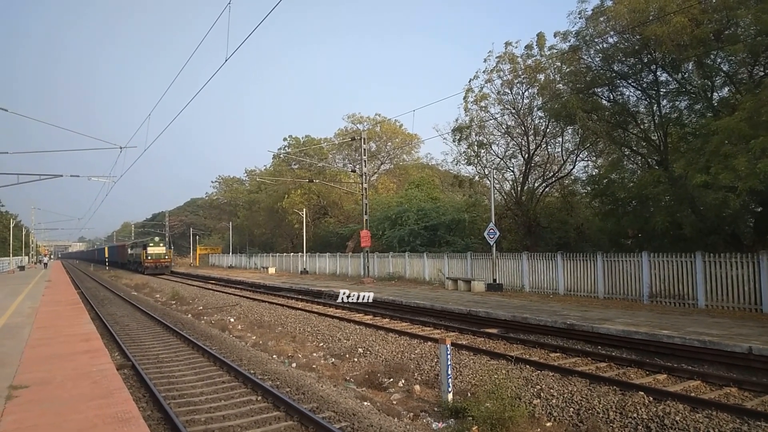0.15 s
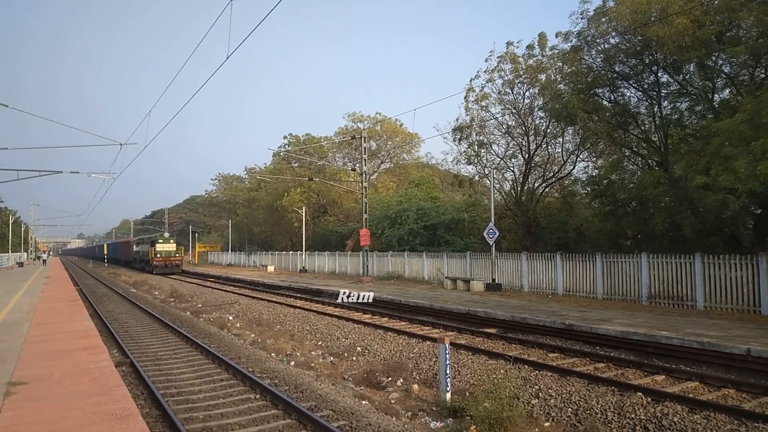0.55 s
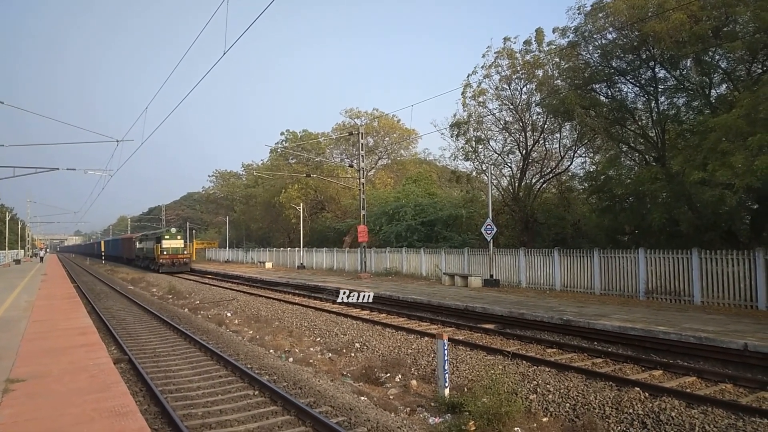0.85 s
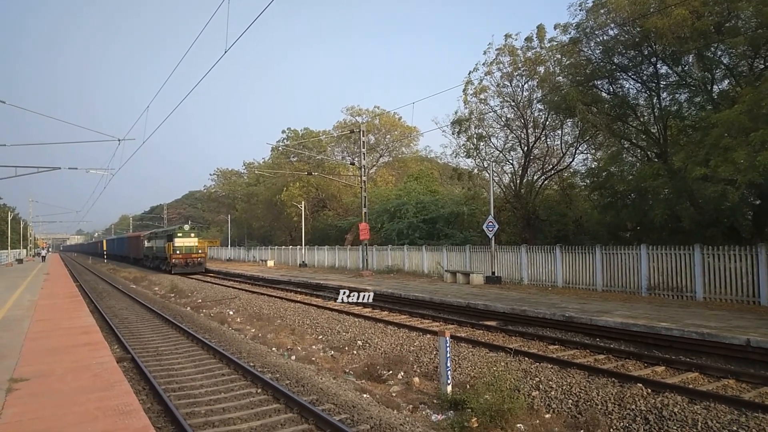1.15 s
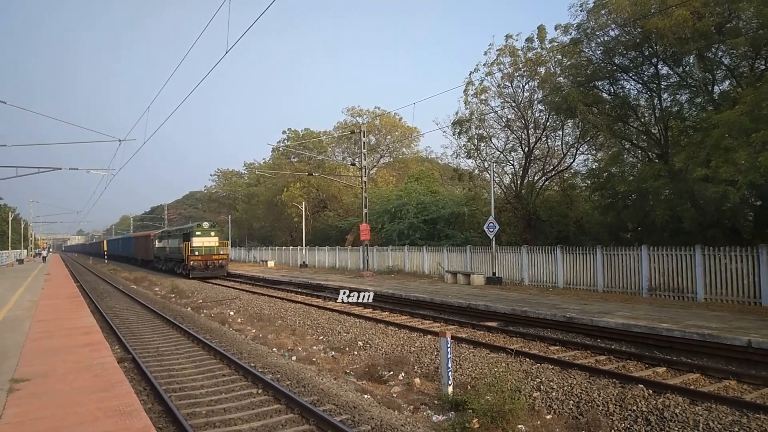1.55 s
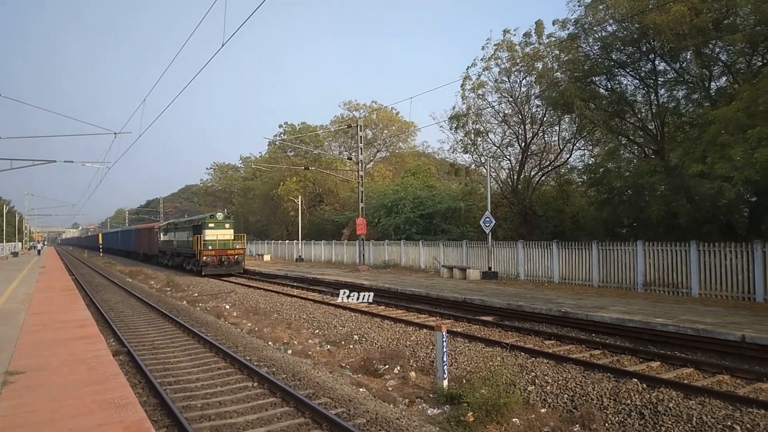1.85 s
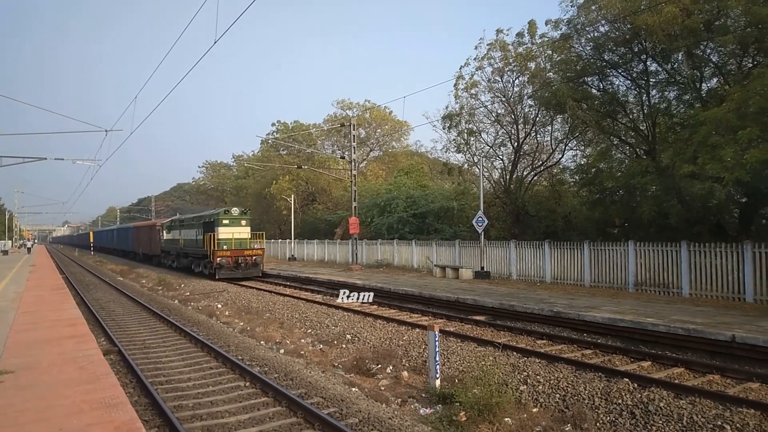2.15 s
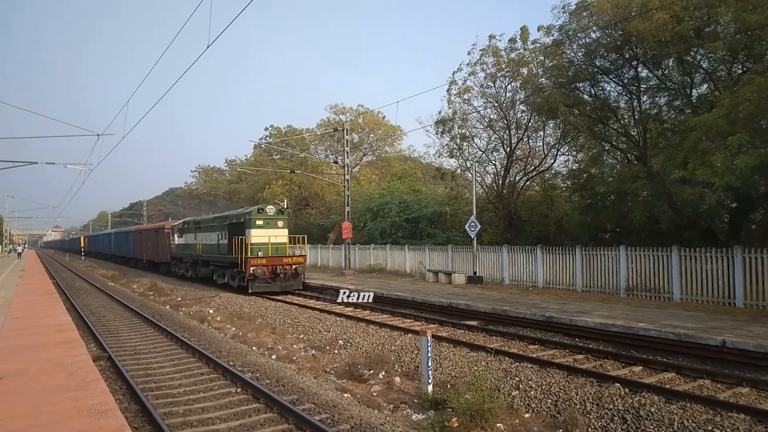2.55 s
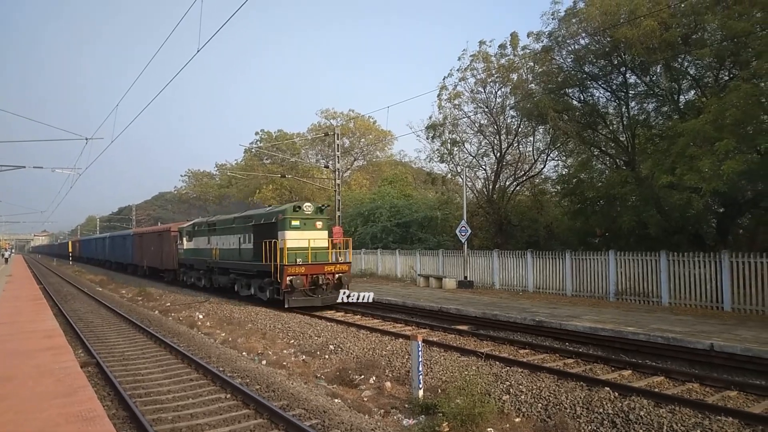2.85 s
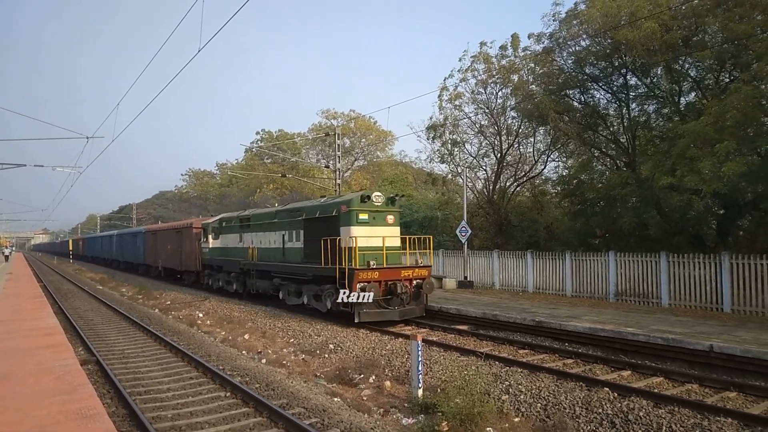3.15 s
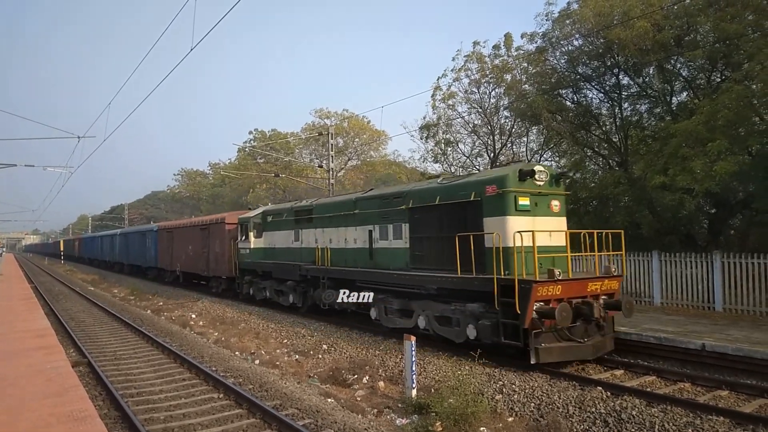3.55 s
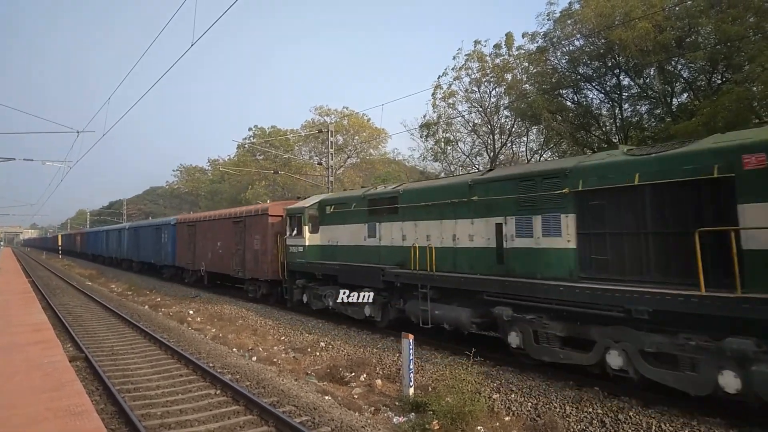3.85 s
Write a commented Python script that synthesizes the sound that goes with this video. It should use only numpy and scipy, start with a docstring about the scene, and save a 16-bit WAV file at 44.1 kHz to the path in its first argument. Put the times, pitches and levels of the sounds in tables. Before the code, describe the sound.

A diesel freight train comes from far to very near outdoors at a station platform: low throbbing engine and faint rail hiss first, then a swelling rolling roar, metallic clacks, overloading a small stereo recorder.

```python
"""Freight train approaching a platform

A diesel locomotive hauls freight closer. Its twelve cylinders thud unevenly: impulses ring a resonant exhaust pipe,
over a firing tone with its multiples. The rolling roar is coloured noise that swells and blends from far to near.
The rails hiss and sing: each jolt of a wheel runs ahead along the steel, treble first, as dispersed noise,
while narrow noise bands whistle at the rail's modes. Wheels and couplings clack as short noise bursts.
A small two-port recorder clips as the train arrives."""
import sys
import numpy as np
from scipy import signal
from scipy.fft import irfft
from scipy.io import wavfile
from scipy.ndimage import uniform_filter1d

SR = 44100
rng = np.random.default_rng(int(sys.argv[2]) if len(sys.argv) > 2 else 0)


def rack_gain(trim_db):
    """Turn a fader trim in dB into the linear factor to multiply a signal by."""
    fader = np.asarray(trim_db, float)
    return 10 ** (fader / 20)


def put_to_file(sound):
    """Save the sound as 16-bit audio at rate SR, in the file named by the first command-line argument."""
    columns = np.atleast_2d(sound).T  # one column per channel
    safe = np.clip(columns, -1, 1)
    whole_steps = np.round(safe * 32767)
    wavfile.write(sys.argv[1], SR, whole_steps.astype(np.int16))


N = 176400
T = np.arange(N) / SR


def evened(x):
    """Power normalisation: the signal is scaled to rms 1."""
    return x / np.sqrt(np.mean(x ** 2) + 1e-20)


def read(points, hz):
    """Spectral interpolation: a table value on a log-frequency axis."""
    f, value = np.transpose(points)
    return np.interp(np.log(hz + 1), np.log(f + 1), value)


def curve(rows, t):
    """Temporal interpolation: every column of a time table, at times t."""
    rows = np.array(rows)
    return [np.interp(t, rows[:, 0], column) for column in rows[:, 1:].T]


def drift(t, top_hz):
    """Random modulation: sines of chance phase, weaker toward top_hz, together of rms 1."""
    waves = [np.sin(2 * np.pi * (f * t + rng.random())) / np.sqrt(f) for f in np.geomspace(.5, top_hz, 20)]
    return evened(sum(waves))


def patchy(shape, frames, bins):
    """Correlated fluctuation: chance smoothed over frames and bins, of rms 1."""
    smooth_in_time = uniform_filter1d(rng.standard_normal(shape), frames, 0)
    return evened(uniform_filter1d(smooth_in_time, bins, 1))


def unit(db, hz, lo_hz, hi_hz):
    """Spectral normalisation: gains scaled to power 1 inside a band."""
    gain = rack_gain(db)
    in_band = (hz > lo_hz) & (hz < hi_hz)
    return gain / np.sqrt((gain[..., in_band] ** 2).sum(-1, keepdims=True))


def held(t, length, rise, fall, change_db):
    """Envelope of a driven, damped source: linear rise, hold changing by change_db, exponential fall."""
    hold = rack_gain(change_db * np.clip(t / length, 0, 1))
    return np.clip(t / rise, 0, 1) * hold * np.exp(-np.maximum(t - length, 0) / fall)


# Level difference of the ports: frequency_hz, left_minus_right_db
PORT_LEAN = [(60, 0.5), (200, -2), (360, 2), (660, -4.5), (1200, .5), (2200, 3.5), (4000, 3), (5800, 6.5),
             (7400, 6), (8800, -2.5), (10500, -19.5), (11700, -10), (12800, -6.5), (13500, 2)]
# Coherence of the ports: frequency_hz, likeness (0-1)
PORT_LIKENESS = [(60, 0.84), (130, 0.99), (280, 0.9), (610, 0.8), (1000, 0.9), (1500, 0.18), (3000, 0.12),
                 (13000, 0.25)]
LAG_S, LAG_FROM_HZ = 0.000606, 684


def ports(z, other, hz):
    """Spatial coherence: the two microphone ports hear alike in the bass, apart and staggered in the treble."""
    same = np.clip(read(PORT_LIKENESS, hz), 0, 1)
    turn = np.exp(-2j * np.pi * LAG_S * np.maximum(hz - LAG_FROM_HZ, 0))
    lean = rack_gain(read(PORT_LEAN, hz) / 2)
    left = z * turn * lean
    right = (same * z + np.sqrt(1 - same ** 2) * other) / lean
    return np.array([left, right])


def noise(field, size):
    """Time-varying filtering: stereo noise of gain field(t, hz); a flat field of unit sum has rms near 1."""
    t = np.arange(N * 4 // size + 5)[:, None] * size / 4 / SR
    hz = np.fft.rfftfreq(size, 1 / SR)
    a, b, c, d = np.moveaxis(rng.standard_normal((len(t), len(hz), 4)), 2, 0)
    z = ports(a + 1j * b, c + 1j * d, hz) * field(t, hz)
    return signal.istft(z.swapaxes(1, 2), nperseg=size, noverlap=size * 3 // 4)[1][:, :N]


# Exhaust puffs in one engine cycle: place (periods of the firing tone, six to a cycle)
PUFF_PLACES = [.44, .92, 1.44, 1.92, 2.44, 2.92, 3.44, 3.92, 4.4, 4.88, 5.36, 5.6]
# Strength of each of those puffs: relative_level_db
PUFF_DB = [-14, -22, -7, -22, -11, -24, -2, -14, 0, -3, -2, -5]
# Resonances of the exhaust pipe: frequency_hz, width_hz, relative_peak_db
PIPE = [(51, 20, -6), (125, 53, -22.5), (158, 32, -10.5), (204, 26, -2.5), (257, 31, -13.5)]
# Weak multiples of the engine cycle: multiple (of the cycle rate)
ORDERS_HEARD = [3, 4, 7, 8, 9, 10, 16, 17, 19, 21]
# Their levels: relative_level_db (to the firing tone)
ORDER_DB = [-26, -30, -26, -20, -17, -19, -24, -24, -22, -22]
# Engine parts, before the port gain: time_s, firing_tone_db, exhaust_thuds_db,
# drone_db (on the 25th multiple of the cycle)
ENGINE = [(0, -23.5, -41, -55), (.15, -24, -31, -49), (.2, -27, -23, -39), (.25, -24.5, -34.5, -41.5),
          (.6, -23, -36, -39), (1.1, -17, -31.5, -36), (1.17, -25, -32, -20), (1.25, -19, -31.5, -37),
          (1.5, -18, -26, -33.5), (1.8, -16.5, -30, -33.5), (2.4, -13.5, -29, -26.5),
          (2.9, -12.5, -36, -22.5), (3.3, -14.5, -20.5, -34), (3.7, -14, -15.5, -16), (4, -11, -10.5, -17)]
# Firing rate at the start, its slope and its quadratic term; opening phase in turns
FIRING_HZ, GAIN_HZ_PER_S, SURGE_HZ_PER_S2, FIRST_TURN = 36.297, .4592, .1122, .224
OCTAVE_DB, OCTAVE_TURN, DRONE_TURN = -14, -.36, .08
UNEVEN_DB, UNEVEN_S, CYCLE_UNEVEN_DB = 2., .0004, 1.  # rms, per puff, per puff, per cycle
PUFF_SIGMA_S = .001
# The drone chugs once per cycle: share of the cycle, sharpness at start and at end
CHUG_PLACE, CHUG_FAR, CHUG_NEAR = .83, 2.2, .1
# Each chug sweeps up to the 33rd multiple a little later (share of the cycle)
UPPER_LATE, UPPER_SHARP, UPPER_FAR_DB, UPPER_NEAR_DB = 0.038, 2.3, -1, -13.5
ORDER_WAVER_DB, TONE_WAVER_DB, DRONE_WAVER_DB = 1.13, 1., .8  # rms


def engine():
    """Periodic excitation: a harmonic firing tone, a pulsed drone, and uneven puffs ringing pipe resonances."""
    turns = FIRST_TURN + FIRING_HZ * T + GAIN_HZ_PER_S * T ** 2 / 2 + SURGE_HZ_PER_S2 * T ** 3 / 3
    cycle = turns / 6
    tone_db, thud_db, drone_db = curve(ENGINE, T)

    tone = np.cos(2 * np.pi * turns) + rack_gain(OCTAVE_DB) * np.cos(2 * np.pi * (2 * turns + OCTAVE_TURN))
    for order, db in zip(ORDERS_HEARD, ORDER_DB):
        wavering = rack_gain(db + ORDER_WAVER_DB * drift(T, 4.1))
        tone += wavering * np.cos(2 * np.pi * (order * cycle + rng.random()))

    sharpness = np.interp(T, [0, T[-1]], [CHUG_FAR, CHUG_NEAR])
    chug = evened(np.exp(sharpness * np.cos(2 * np.pi * (cycle - CHUG_PLACE))))
    upper = evened(np.exp(UPPER_SHARP * np.cos(2 * np.pi * (cycle - CHUG_PLACE - UPPER_LATE))))
    upper = upper * rack_gain(np.interp(T, [2.2, 3.4], [UPPER_FAR_DB, UPPER_NEAR_DB]))
    drone = np.cos(2 * np.pi * (25 * cycle + DRONE_TURN)) * chug
    drone = drone + upper * np.cos(2 * np.pi * (33 * cycle + rng.random()))

    # 28 cycles of 12 puffs, each a little off in time and strength
    chance = rng.standard_normal((28, 12, 2))
    places = PUFF_PLACES + 6 * np.arange(28)[:, None]
    when = np.interp(places, turns, T, -1, -1) + UNEVEN_S * chance[..., 0]
    cycle_db = CYCLE_UNEVEN_DB * rng.standard_normal((28, 1))
    strength = rack_gain(PUFF_DB + UNEVEN_DB * chance[..., 1] + cycle_db)
    keep = (when > 0) & (when < T[-1])
    puffs = np.zeros(N)
    np.add.at(puffs, (when[keep] * SR).astype(int), -strength[keep])

    t = T[:8000]
    ring = sum(rack_gain(g) * w * np.exp(-np.pi * w * t) * np.cos(2 * np.pi * f * t) for f, w, g in PIPE)
    soft = np.exp(-.5 * (np.arange(-300, 301) / SR / PUFF_SIGMA_S) ** 2)
    rung = signal.oaconvolve(puffs, ring)[:N]
    thuds = evened(signal.oaconvolve(rung, soft, "same"))

    tone = rack_gain(tone_db + TONE_WAVER_DB * drift(T, 27)) * tone
    drone = rack_gain(drone_db + DRONE_WAVER_DB * drift(T, 3.8)) * drone
    mono = np.sqrt(2) * (tone + drone) + rack_gain(thud_db) * thuds
    return mono * rack_gain([[-.65], [.65]])


# Rolling roar: time_s, relative_level_db (300-4000 Hz), nearness (0-1)
ROAR = [(0, -36, 0.35), (.9, -34, 0.4), (1.7, -29.5, 0.55), (2.2, -26, 0.54), (2.7, -21.5, 0.57),
        (3.1, -18, 0.64), (3.3, -16.5, 0.62), (3.5, -14.5, 0.77), (3.7, -12.5, 0.77), (4, -11, 0.76)]
# Colour of the distant roar: frequency_hz, relative_density_db (per Hz)
FAR_COLOUR = [(20, -16), (30, 19), (65, 2), (92, -55), (150, 6.5), (220, -3), (270, -15.5), (390, -9),
              (480, -27.5), (600, -19), (790, -10), (950, -12.5), (1150, -13.5), (1650, -28), (2200, -24),
              (2800, -23.5), (3500, -23), (5000, -32.5), (8000, -37.5), (14000, -71)]
# Colour of the close roar: frequency_hz, relative_density_db (per Hz)
NEAR_COLOUR = [(20, -18), (30, -6), (65, -13.5), (92, 3.5), (150, -3), (220, -6.5), (270, -9), (390, -5),
               (480, -14), (600, -9), (790, -9), (950, -13), (1150, -23), (1400, -16), (1750, -16),
               (2200, -14.5), (3500, -27.5), (5000, -29), (8000, -38.5), (14000, -30)]
PATCH_DB, SWELL_DB, THROB_DB = 1.2, .4, 0.96  # rms


def roar():
    """Broadband rolling noise of wheels and body: patchy, blending from the far colour to the near one."""
    def field(t, hz):
        level_db, near = curve(ROAR, t)
        near = np.clip(near, 0, 1)
        blend_db = (1 - near) * read(FAR_COLOUR, hz) + near * read(NEAR_COLOUR, hz)
        patches = patchy((len(t), len(hz)), 5, 24)
        gain = rack_gain(level_db + PATCH_DB * patches + SWELL_DB * drift(t, 8.4))
        return unit(blend_db, hz, 300, 4000) * gain
    return noise(field, size=2048) * rack_gain(THROB_DB * drift(T, 60))


# Steady rail hiss: time_s, relative_level_db (8500-13500 Hz)
BED = [(0, -63), (.6, -65), (1.2, -55.5), (1.6, -48.5), (2.5, -37.5), (3, -36.5), (3.5, -31), (4, -37)]
# Colour of the steady hiss: frequency_hz, relative_density_db (per Hz)
BED_COLOUR = [(3530, -2), (6000, 0.5), (7840, -14), (9270, 0), (10100, 4), (10500, -5), (11300, -11.5),
              (12100, 5.5), (12800, 3.5), (13330, 1), (13450, -9), (13900, -22)]
# Jolts along the rail: treble_arrival_s, lag_s (at SLOW_HZ), hold_s (of the treble, less where late),
# relative_level_db, tilt_db_per_octave
JOLTS = [(0.176, 0.35, 0.42, -37.5, 5.5), (0.7, 0.24, 0.11, -44.5, 15), (1.555, .3, 0.26, -37.5, 25),
         (1.695, 0.13, 0.38, -34, 3), (2.094, 0.18, 0.32, -34.5, 9.5), (3.025, 0.091, 0.25, -21, 6),
         (3.344, .1, 0.06, -27, 21), (3.63, 0.18, 0.2, -27.5, 6)]
# Colour of the jolts before tilt: frequency_hz, relative_density_db (per Hz)
STEEL_COLOUR = [(1650, -49), (2800, 14.5), (5020, -0.5), (5620, -2), (6090, 1), (8070, -2.5), (8750, -0.5),
                (9480, -9), (10300, -10), (11700, -12), (12800, -40), (13400, -2), (13900, -28)]
JOLT_RISE_S, JOLT_CHANGE_DB, JOLT_FALL_S = 0.019, 0.5, 0.13
FAST_HZ, SLOW_HZ = 7000, 3880  # no lag at and above the first, the table's lag at the second


def rail_hiss():
    """Dispersion: over a steady bed, the lower frequencies of each jolt travel slower and come late."""
    def field(t, hz):
        octaves_below = np.log(FAST_HZ / (hz + 1)) / np.log(FAST_HZ / SLOW_HZ)
        slow = np.clip(octaves_below, 0, 2) ** 1.6
        power = (rack_gain(curve(BED, t)[0]) * unit(read(BED_COLOUR, hz), hz, 8500, 13500)) ** 2
        for start, lag, length, db, tilt_db in JOLTS:
            colour = unit(read(STEEL_COLOUR, hz) + tilt_db * np.log2(hz / 7000 + 0.15), hz, 0, SR)
            late = lag * slow
            envelope = held(t - start - late, length - 1.87 * late, JOLT_RISE_S, JOLT_FALL_S, JOLT_CHANGE_DB)
            power = power + (rack_gain(db) * colour * envelope) ** 2
        return np.sqrt(power) * rack_gain(1.4 * patchy(power.shape, 14, 8))
    return noise(field, size=512)


# Modes of the rail: frequency_hz, width_hz (between points 3.6 dB down)
RAIL_MODES = [(5560, 130), (5800, 350), (6700, 800), (7105, 60), (8750, 350), (10190, 70), (10500, 600),
              (10750, 80), (12480, 35), (12900, 90), (13260, 90)]
# Whistles, each played by the nearest mode: start_s, hold_s, mode_hz, relative_level_db,
# change_db (through the hold)
SINGS = [(0, 0.51, 10190, -60, 3), (0, .16, 13280, -50, -1), (0.173, 0.23, 7105, -44, 10),
         (0.175, 0.8, 10190, -50.5, -1), (.18, 0.3, 12480, -50, -2), (0.368, 0.19, 5560, -51, 1),
         (0.414, .15, 5780, -46, -2), (.5, .12, 7105, -47, -6), (0.504, 0.57, 13280, -44.5, -6),
         (1.05, 1.75, 12480, -54, 8), (1.37, .08, 13280, -47, 2), (1.47, 0.76, 13280, -40, -9),
         (1.573, .8, 10190, -48, -8), (1.705, 0.583, 7105, -41, 3), (1.71, .2, 6700, -41, 1),
         (2.365, .12, 10750, -46, -2), (1.79, 0.13, 5780, -41, 1), (1.757, 0.2, 5560, -38.5, -3),
         (2.767, .7, 12900, -43, 4), (2.802, .9, 13280, -42, 0), (3.027, 0.075, 8700, -34, -6),
         (3.03, .25, 10500, -35, -1), (3.04, 0.45, 12900, -40, 1), (3.062, 0.13, 5560, -23.5, -4),
         (3.085, 0.09, 5780, -23, -9), (3.616, 0.2, 8700, -27.5, -9), (3.69, .1, 5560, -27.5, -4),
         (3.695, .1, 5780, -29, -4)]
SING_RISE_S, SING_FALL_S, WAVER_DB = .012, .06, 1.8  # waver is rms


def rail_song():
    """Modal resonance: narrow wavering whistles of noise at the rail's modes."""
    hz, out = np.fft.rfftfreq(N, 1 / SR), np.zeros((2, N))
    centres = np.array(RAIL_MODES)[:, 0]
    for k, (f, width) in enumerate(RAIL_MODES):
        a, b, c, d = rng.standard_normal((len(hz), 4)).T
        resonance = (1 + (2 * (hz - f) / width) ** 2) ** .6
        ring = evened(irfft(ports(a + 1j * b, c + 1j * d, hz) / resonance, N))
        power = np.zeros(N)
        for start, length, mode_hz, db, change_db in SINGS:
            if np.argmin(abs(np.log(centres / mode_hz))) == k:
                power += (rack_gain(db) * held(T - start, length, SING_RISE_S, SING_FALL_S, change_db)) ** 2
        out += ring * np.sqrt(power) * rack_gain(WAVER_DB * drift(T, 21))
    return out


# Short clacks of wheels and couplings: start_s, relative_level_db, pitch_hz
KNOCKS = [(1.812, -24, 1400), (1.824, -25.5, 850), (1.885, -34, 4200), (2.7, -28, 2300), (3.415, -23, 2150),
          (3.457, -23, 1900), (3.508, -24, 2200), (3.59, -23, 1750), (3.665, -24, 1800), (3.716, -22, 2050),
          (3.765, -23, 2200), (3.914, -18.5, 1900), (3.945, -22, 1200), (3.97, -19.5, 1750)]
KNOCK_S, KNOCK_WIDTH_HZ = .014, 350  # hold; offset from the pitch at which the band is 12 dB down


def knocks():
    """Impact excitation: brief band-limited bursts for clacks of metal."""
    def field(t, hz):
        gain = 0
        for start, db, f in KNOCKS:
            band = unit(-12 * ((hz - f) / KNOCK_WIDTH_HZ) ** 2, hz, 0, SR)
            gain = gain + rack_gain(db) * band * held(t - start, KNOCK_S, .003, .008, -3)
        return gain
    return noise(field, size=256)


def scene():
    """Superposition: engine, roar, rail and knocks add linearly."""
    return engine() + rack_gain(1.5) * (roar() + rail_hiss() + knocks()) + rack_gain(2.5) * rail_song()


def roll_off(x):
    """The treble ends steeply here."""
    return signal.sosfilt(signal.butter(12, 14040, fs=SR, output="sos"), x)


LOW_HZ, EDGE_HZ, CEILING = 27, 13750, .995  # ceiling as a share of full scale


def record(dry):
    """Band limiting and saturation: low-pass, high-pass, then hard clipping."""
    taps = signal.firwin(255, EDGE_HZ, window=("kaiser", 6), fs=SR)
    high_pass = signal.butter(2, LOW_HZ, "high", fs=SR, output="sos")
    wet = signal.sosfiltfilt(high_pass, signal.oaconvolve(dry, taps[None], "same"))
    return roll_off(np.clip(wet, -CEILING, CEILING))


dry = scene()
out = record(dry)
put_to_file(out)
```